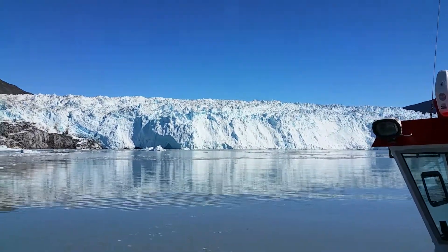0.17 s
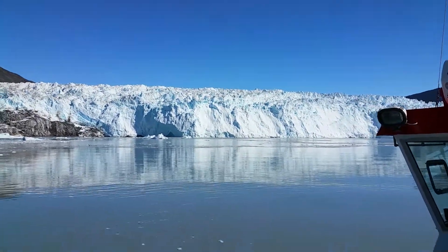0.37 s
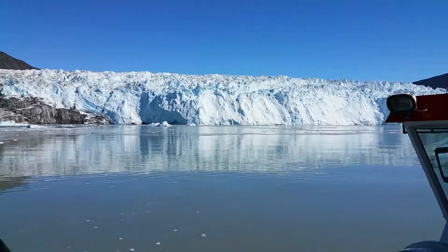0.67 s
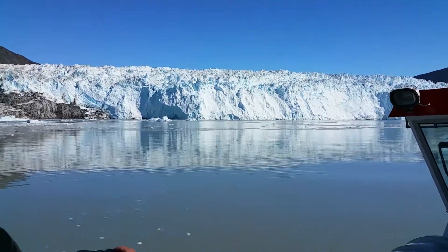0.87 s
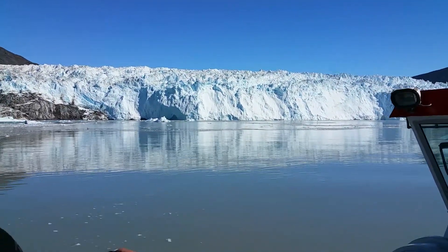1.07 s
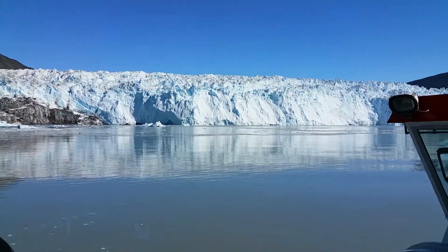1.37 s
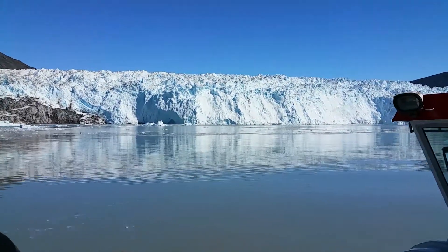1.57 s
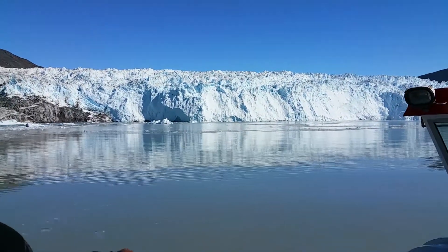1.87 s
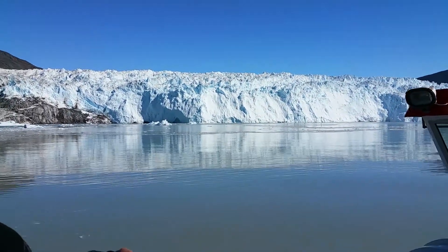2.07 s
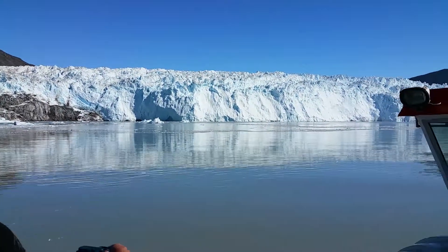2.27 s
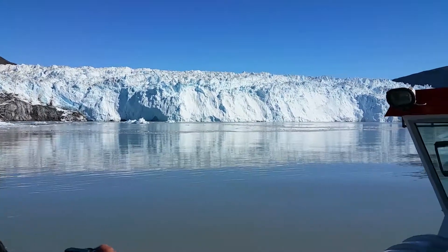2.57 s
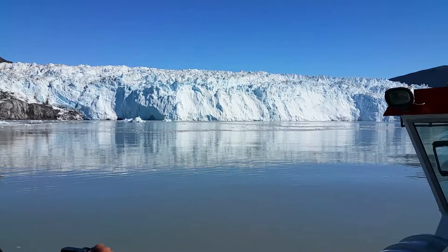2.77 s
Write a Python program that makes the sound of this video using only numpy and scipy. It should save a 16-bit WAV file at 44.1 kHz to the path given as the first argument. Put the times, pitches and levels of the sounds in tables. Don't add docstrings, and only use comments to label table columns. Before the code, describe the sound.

A low, steady diesel boat engine idles on calm open water, with hull rumble and soft exhaust wash; close handling ticks and dull bumps, one sharp tap near two seconds, then the drone sags slightly.

```python
import sys
import numpy as np
from scipy import signal
from scipy.fft import rfft, irfft, next_fast_len
from scipy.io import wavfile
from scipy.ndimage import uniform_filter1d, map_coordinates

SR = 44100
rng = np.random.default_rng(int(sys.argv[2]) if len(sys.argv) > 2 else 0)


def rack_gain(trim_db):
    fader = np.asarray(trim_db, float)
    return 10 ** (fader / 20)


def unload_wav(signal):
    wavfile.write(
        sys.argv[1],
        SR,
        np.round(np.clip(np.atleast_2d(signal).T, -1, 1) * 32767).astype(np.int16),
    )


N = 129213

FIRING = 6
WASH_FOLLOWS = 1

# (time [s], speed [engine cycles/min], firing tone [dB])
SPEED = [(0.0, 510.9, -12.3), (0.5, 511.6, -13.8), (1.0, 510.9, -12.6), (1.5, 510.4, -12.6),
         (1.9, 511.9, -14.5), (2.2, 506.8, -13.7), (2.45, 500.8, -15.9), (2.7, 496.8, -16.3),
         (2.93, 496.3, -15.1)]


def unit(x):
    return x / np.sqrt(np.mean(x ** 2) + 1e-20)


def along(points, hz):
    f, v = np.transpose(points)
    return np.interp(np.log(hz + 1), np.log(f + 1), v)


def curve(rows, axis=1):
    columns = np.transpose(rows)
    return np.interp(np.arange(N) / SR, columns[0], columns[axis])


def wobble(rate):
    knots = rng.standard_normal(int(N * 40 / SR))
    return map_coordinates(knots, [np.arange(N) * min(rate, 39) / SR])


def filtered(x, response):
    m = next_fast_len(N + SR // 2)
    hz = np.fft.rfftfreq(m, 1 / SR)
    return irfft(rfft(x, m) * response(hz), m)[..., :N]


def rush(spectrum, patchy_db):
    # (frequency [Hz], likeness [0-1])
    alike = [(60, 1), (150, 1), (360, 0.77), (900, .45), (2200, .05), (5450, .05)]
    # (frequency [Hz], left over right [dB])
    lean = [(60, 1.5), (130, 5.5), (300, 1.5), (900, 8), (2200, 0), (5450, 5)]
    z = signal.stft(rng.standard_normal((2, N)), nperseg=512)[2]
    field = uniform_filter1d(rng.standard_normal(z.shape[1:]), size=5, axis=0)
    field = uniform_filter1d(field, size=12, axis=1)
    pair = signal.istft(z * rack_gain(patchy_db * unit(field)), nperseg=512)[1][:, :N]
    shut = [(spectrum[0][0] / 2, -30), *spectrum, (spectrum[-1][0] * 2, -60), (20000, -110)]

    def mid_side(hz):
        angle = np.arccos(np.clip(along(alike, hz), -1, 1)) / 2
        return rack_gain(along(shut, hz)) * [np.cos(angle), np.sin(angle)]

    mid, side = filtered(pair, mid_side)
    left_right = np.array([mid + side, mid - side])
    return unit(filtered(left_right, lambda hz: rack_gain(np.outer([.5, -.5], along(lean, hz)))))


def generator_hum():
    hum_hz, hum_db, octave_db, drift_rad = 100.03, -36, -7, 1.2
    swell = np.sqrt(2) * rack_gain(hum_db + 1.7 * wobble(5))
    phase = 2 * np.pi * hum_hz * np.arange(N) / SR + drift_rad * wobble(4.5)
    hum = swell * (np.cos(phase) + rack_gain(octave_db) * np.sin(2 * phase))
    return hum * rack_gain([[1.5], [-1.5]])


def grip_pressure():
    # (time [s], grip pressure [dB])
    squeeze = [(0, -77.5), (.4, -80.5), (.52, -70.5), (.8, -75), (1.05, -74.5), (1.2, -84.5), (1.75, -80),
               (1.9, -76), (2.05, -76), (2.3, -70), (2.45, -74.5), (2.65, -82), (2.8, -78), (2.93, -72)]
    return curve(squeeze)


def grip_hiss():
    # (frequency [Hz], density [dB per Hz])
    hiss_colour = [(6000, -9), (7000, -19), (8500, -29), (10000, -16), (12000, -3), (14500, 0), (15800, 0)]
    hiss_db, follows_grip = -75.5, .7
    press = grip_pressure()
    hiss = filtered(rng.standard_normal((2, N)), lambda f: rack_gain(along(hiss_colour, f)) * (f > 3000))
    return rack_gain(hiss_db + follows_grip * (press - press.min())) * unit(hiss)


def grip_creaks():
    # (time [s], peak [dB], left over right [dB])
    clear_ticks = [(.393, -48, 11), (.478, -53, 9), (.532, -50, 9.5), (.566, -51, 10.5), (.7233, -52, 9),
                   (.778, -51, 9.5), (.9497, -52, 8.5), (.9822, -49, 12.5), (1.024, -49, 9.5),
                   (1.073, -52, 8), (1.5184, -53, 7.5), (1.8876, -55, 7), (1.94, -47, 16),
                   (2.083, -51, 11.5), (2.124, -55, 8.5), (2.162, -53, 8), (2.2214, -51, 11),
                   (2.2558, -50, 13), (2.2812, -53, 9), (2.2982, -48, 12.5), (2.3045, -51, 11),
                   (2.385, -48, 12), (2.4389, -53, 10.5), (2.5132, -47, 13.5), (2.5875, -49, 13),
                   (2.8414, -55, 11.5), (2.8604, -53, 13), (2.8883, -54, 11), (2.9008, -48, 12),
                   (2.912, -48, 12)]
    creaks_per_s, creak_db, creak_grows = 400, 7.5, 1.9
    rise_s, echo_s, echo_db, tick_db = .001, .0042, -4, 18
    press = grip_pressure()
    rows = []
    for s, db, pan in clear_ticks:
        for k in (0, 1):
            rows.append((s + rise_s + k * echo_s, db + k * echo_db, pan))
    for place, chance in rng.random((int(3 * creaks_per_s), 2)):
        held = press[int(place * N)]
        db = held + creak_db + (creak_grows - 1) * (held - press.max()) - 3.7 * np.log(chance)
        rows.append((place * N / SR, db, 10))
    rows = np.array(rows)
    t = np.arange(66) / SR
    burst = rng.standard_normal((len(rows), len(t))) * rack_gain(-60 * t / .0022)
    burst = burst / np.linalg.norm(burst, axis=1)[:, None]
    at = (np.round(rows[:, :1] * SR).astype(int) + np.arange(len(t))).ravel()
    pair = []
    for side in (0, 1):
        gain = rack_gain(rows[:, 1:2] + tick_db - side * rows[:, 2:])
        pair.append(np.bincount(at, (burst * gain).ravel(), N + SR)[:N])
    bright = [(5000, -45.5), (9000, -26.5), (12000, -1.5), (15000, 1.5)]  # (Hz, dB)
    return filtered(np.array(pair), lambda f: rack_gain(along(bright, f)))


def soft_bumps():
    # (time [s], level [dB], pitch [Hz])
    thuds = [
        (0.828, -14, 108.6),
        (.885, -20, 90),
        (.826, -32.5, 710),
        (1.32, -29, 250),
        (1.55, -17.5, 120),
        (1.952, -23.5, 44.5),
        (2.391, -32.5, 750),
        (.069, -32, 600),
        (.301, -31, 650),
        (2.705, -34, 710),
    ]
    t, bumps = np.arange(N) / SR, np.zeros(N)
    for s, db, hz in thuds:
        swell = np.exp(-(1.4 * hz * (t - s)) ** 2)
        bumps += rack_gain(db) * swell * np.cos(2 * np.pi * hz * (t - s))
    return bumps * rack_gain([[1.5], [-1.5]])


def port_tap():
    # (frequency [Hz], level [dB])
    tap_colour = [(500, -2), (1200, -4), (2100, -1), (3300, -6), (4500, -1), (5100, -15), (5600, -14),
                  (7000, -34)]
    # (frequency [Hz], level [dB], 60 dB decay [s])
    shell_modes = [(2800, -30, .01), (4050, -30, .016), (3500, -50, .09), (6100, -66, .09)]
    tap_s, tap_db, right_db, right_lag_s = 1.95952, 13.5, -23, .0004
    colour = [(60, -30), *tap_colour, (9000, -52)]
    tap = np.zeros(N)
    tap[round(tap_s * SR)] = -rack_gain(tap_db)
    tap = filtered(tap, lambda f: rack_gain(along(colour, f)))
    after = np.maximum(np.arange(N) / SR - tap_s, 0)
    for hz, db, t60 in shell_modes:
        tap -= rack_gain(db - 60 * after / t60) * np.sin(2 * np.pi * hz * after)

    def through_shell(f):
        return rack_gain(right_db) / (1 + (f / 3000) ** 3) * np.exp(-2j * np.pi * f * right_lag_s)

    return np.array([tap, filtered(tap, through_shell)])


def crank_phase():
    start_rad = -1.26
    return start_rad / FIRING + 2 * np.pi * np.cumsum(curve(SPEED)) / 60 / SR


def engine_load():
    # (time [s], load [dB])
    effort = [(0, -11.5), (.5, -13.5), (1.1, -12.5), (1.5, -13.5), (1.86, -13.5), (1.95, -16), (2.03, -15),
              (2.2, -14), (2.45, -15.5), (2.6, -17.5), (2.78, -16), (2.93, -14)]
    load = curve(effort)
    return load.mean(), load - load.mean()


def port_whistle(swing):
    # (frequency [Hz], width [Hz], level [dB])
    resonances = [(3920, 210, -73), (4450, 360, -78.5), (5700, 350, -87)]

    def ring(f):
        return sum(rack_gain(db) * abs(f * w / (c * c - f * f + 1j * f * w)) for c, w, db in resonances)

    def band(f):
        return 1 / (1 + (f / 4900) ** 12) / (1 + (3500 / (f + 1)) ** 12)

    whistle = filtered(filtered(rng.standard_normal(N), ring), band)
    level = rack_gain(27 + WASH_FOLLOWS * swing + .6 * wobble(4.9))
    return level * whistle * rack_gain([[0], [-14]])


def exhaust_wash(swing, cycle):
    # (frequency [Hz], density [dB per Hz])
    wash_colour = [(340, 2.5), (520, -2), (800, -11), (1300, -16), (2300, -24), (3300, -32), (4500, -36),
                   (6500, -58)]
    wash_db, pulsing = -42, 0.089
    puff = 1 + pulsing * np.cos(FIRING * cycle)
    return rack_gain(wash_db + WASH_FOLLOWS * swing + 0.26 * wobble(3.8)) * puff * rush(wash_colour, patchy_db=0.2)


def hull_rumble(swing):
    # (frequency [Hz], density [dB per Hz])
    rumble_colour = [(20, -10), (38, -5), (70, -1.5), (105, 0), (140, -4), (195, -3.5), (285, -8),
                     (340, -14)]
    level_db = -31 + .5 * swing + 0.32 * wobble(2.3) + 0.29 * wobble(9)
    return rack_gain(level_db) * rush(rumble_colour, patchy_db=1.18)


def firing_tone(mean_load, swing, cycle):
    # (multiple of the engine cycle, level over the load [dB])
    orders = [(3, -34), (5, -16), (6, 0), (7, -35), (8, -16), (9, -18.5), (10, -25), (11, -26), (13, -27),
              (15, -25), (16, -35), (17, -35), (19, -33), (24, -36), (33, -34)]
    crank_offset_rad, silencer_lag_rad = 2.4, 2.1
    hull_from, hull_lag_rad, hull_lag_per_order = 10, 1.1, .55
    side_orders_follow, uneven_db = .4, 1.2
    right_lag_s, pan_db = .0008, 1.1
    tone = np.zeros((2, N))
    for k, db in orders:
        if k >= hull_from:
            late = hull_lag_rad + hull_lag_per_order * (k - hull_from)
        else:
            late = silencer_lag_rad * (k > FIRING)
        phase = k * cycle + crank_offset_rad * (k - FIRING) - late
        if k == FIRING:
            gain_db = db + swing
        else:
            gain_db = db + side_orders_follow * swing + uneven_db * wobble(6)
        lag = 2 * np.pi * k * SPEED[0][1] / 60 * right_lag_s / 2
        tone += np.sqrt(2) * rack_gain(mean_load + gain_db) * np.cos([phase + lag, phase - lag])
    return tone * rack_gain(pan_db * np.array([[.5], [-.5]]))


def engine():
    cycle = crank_phase()
    mean_load, swing = engine_load()
    breath = port_whistle(swing) + exhaust_wash(swing, cycle)
    return breath + hull_rumble(swing) + firing_tone(mean_load, swing, cycle)


def scene():
    hand = grip_hiss() + grip_creaks() + soft_bumps() + port_tap()
    return generator_hum() + hand + engine()


def roll_off(x):
    return signal.sosfilt(signal.butter(12, 15830, fs=SR, output="sos"), x)


def record(dry):
    fade_in_s = .006
    mix = dry * np.minimum(np.arange(N) / SR / fade_in_s, 1)
    return roll_off(mix)


dry = scene()
out = record(dry)
unload_wav(out)
```